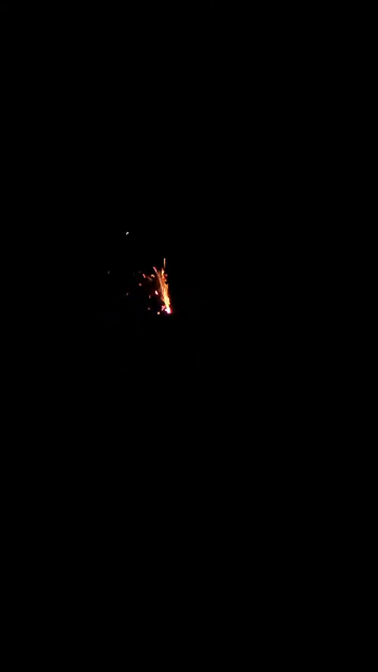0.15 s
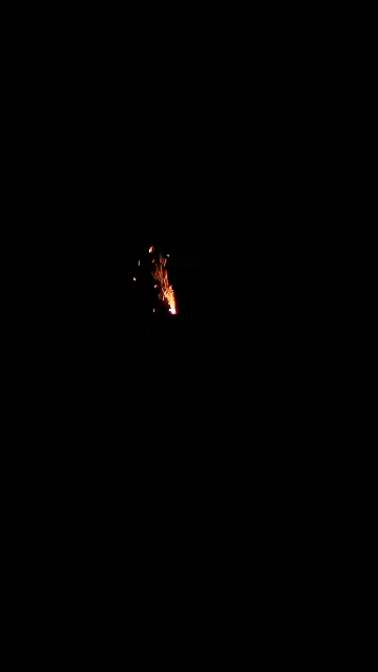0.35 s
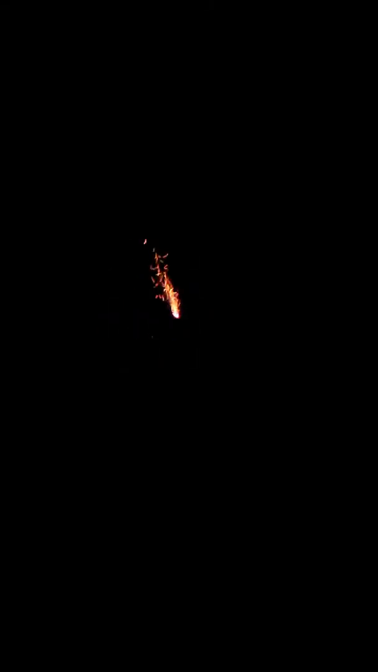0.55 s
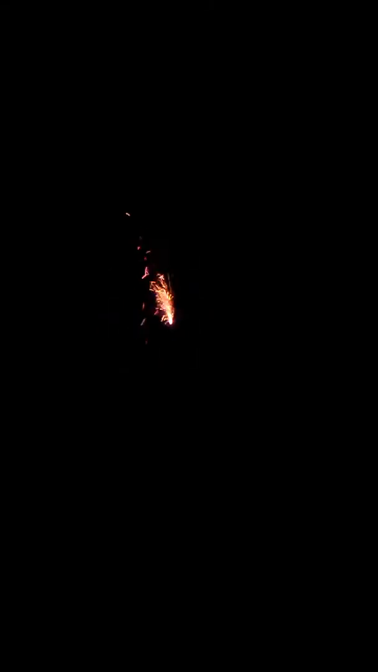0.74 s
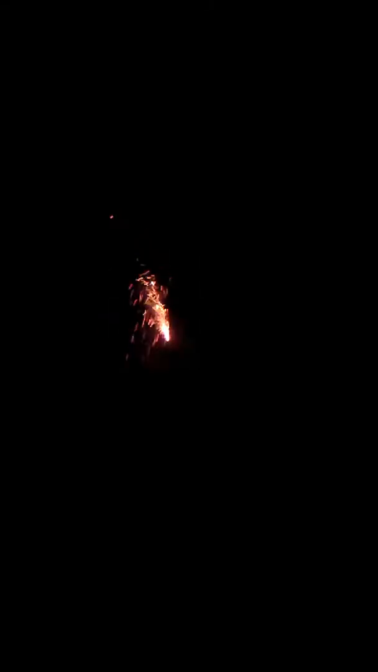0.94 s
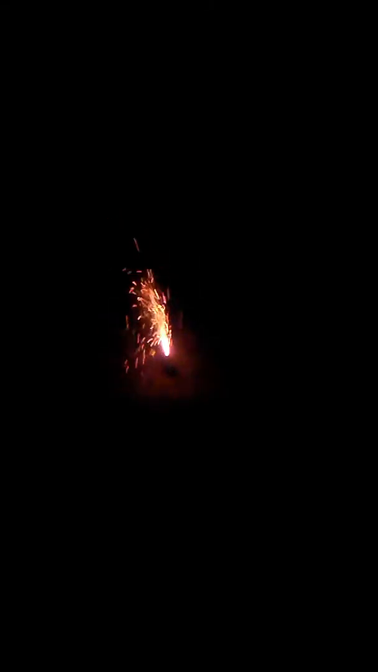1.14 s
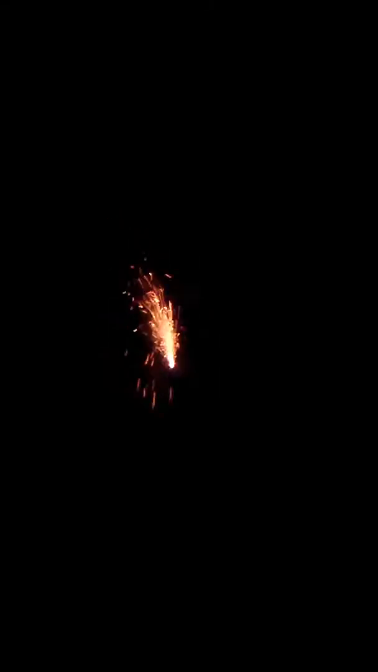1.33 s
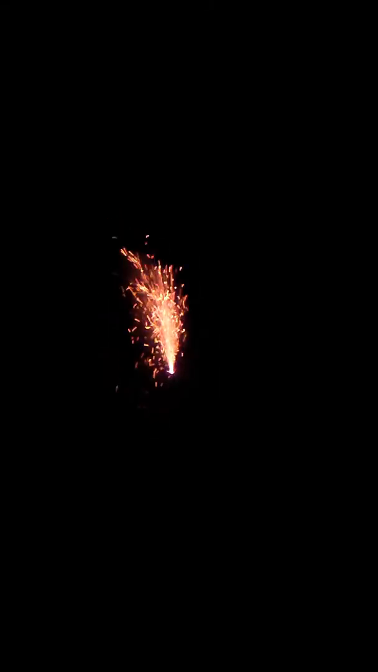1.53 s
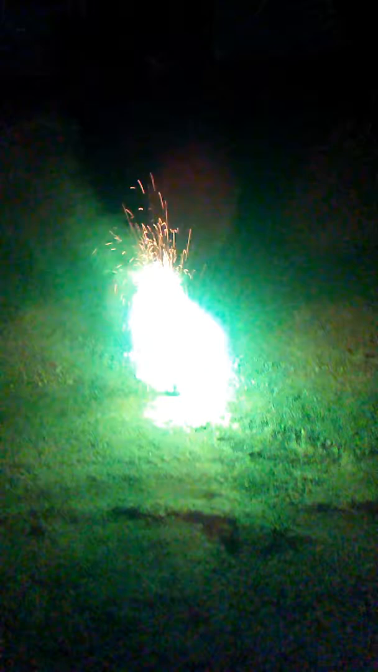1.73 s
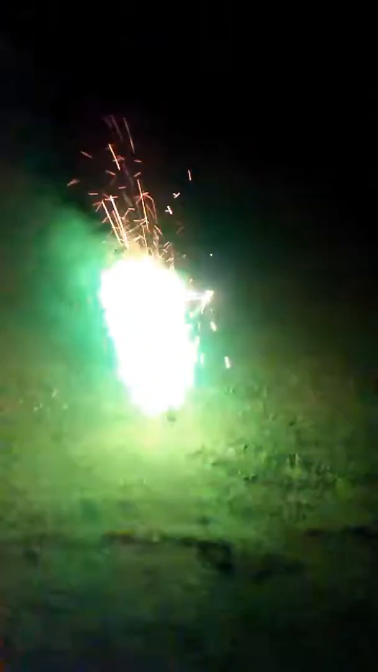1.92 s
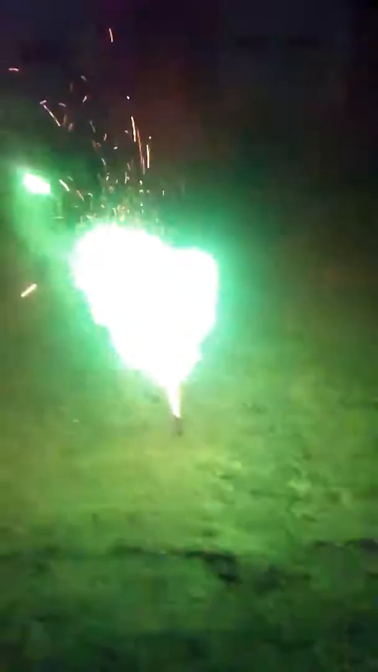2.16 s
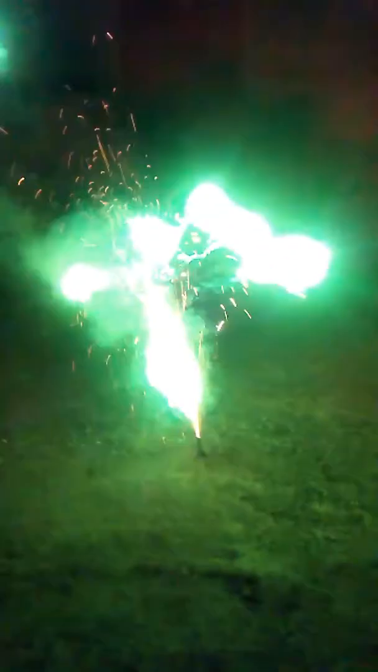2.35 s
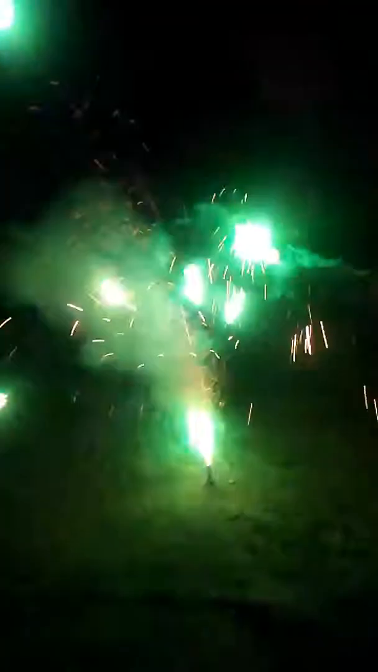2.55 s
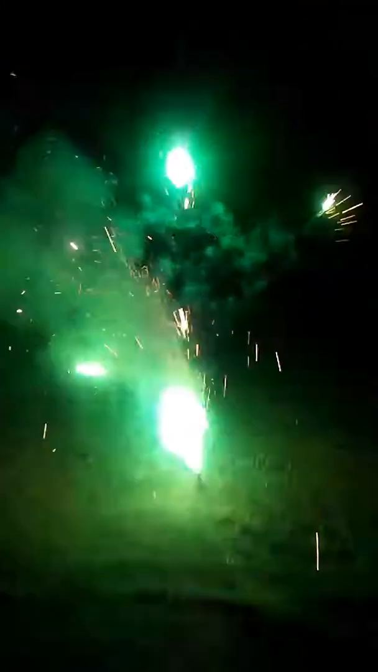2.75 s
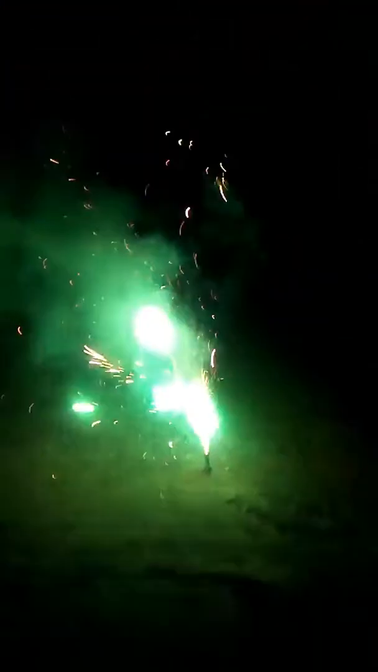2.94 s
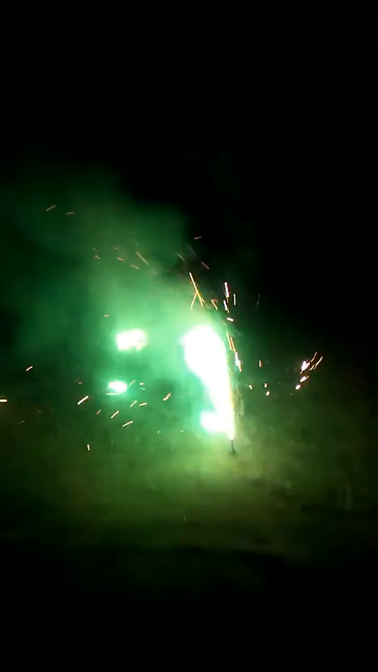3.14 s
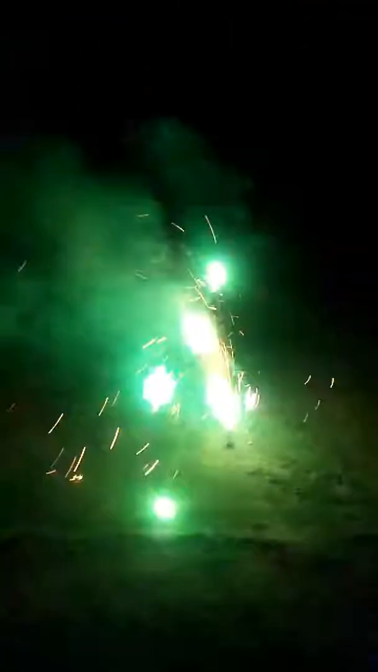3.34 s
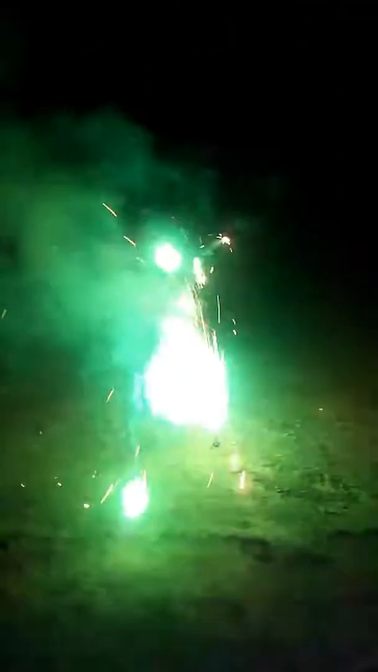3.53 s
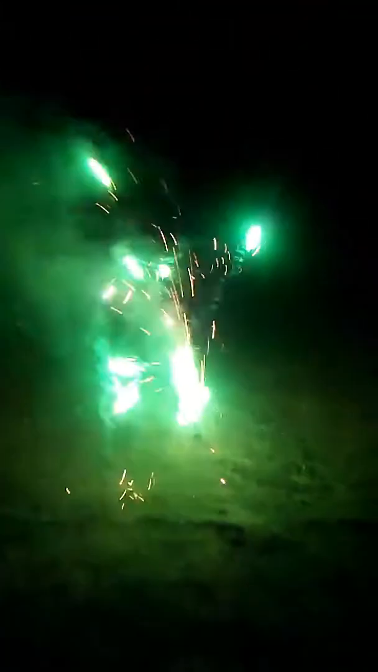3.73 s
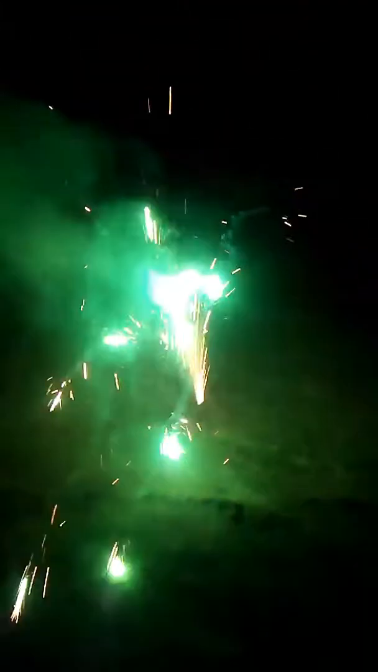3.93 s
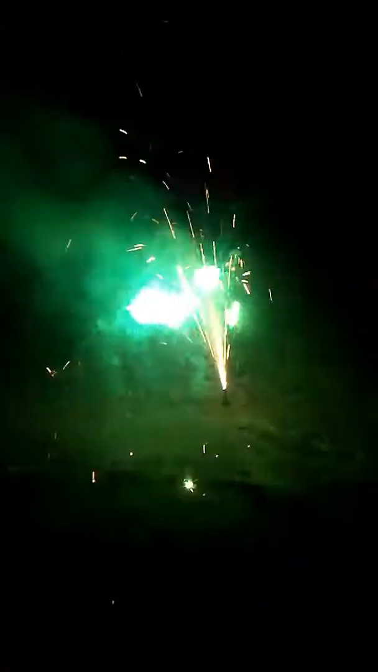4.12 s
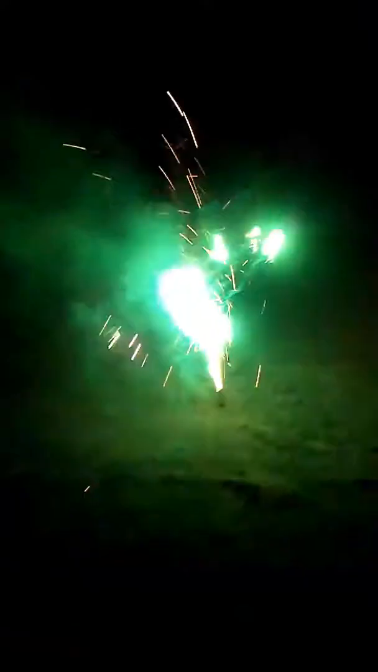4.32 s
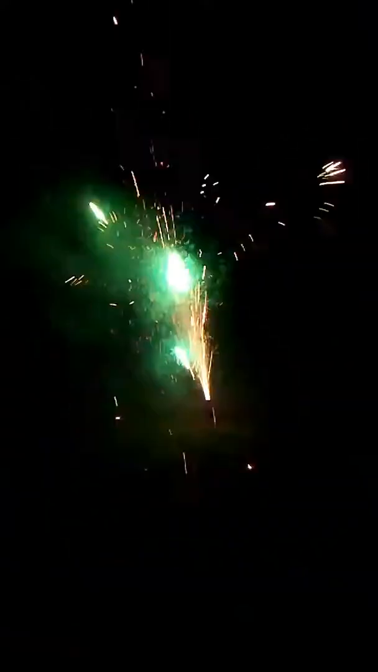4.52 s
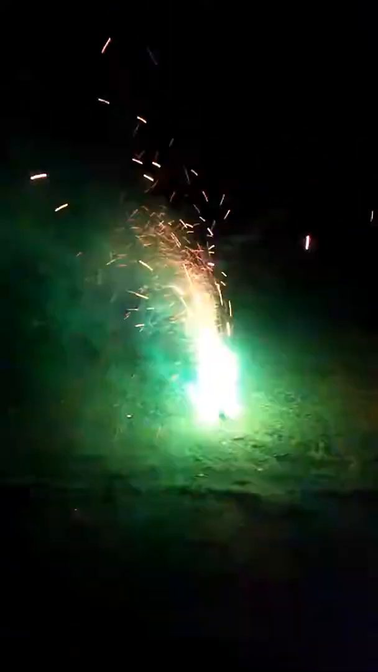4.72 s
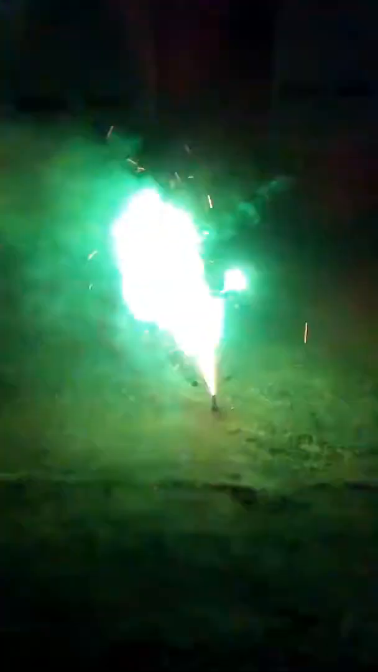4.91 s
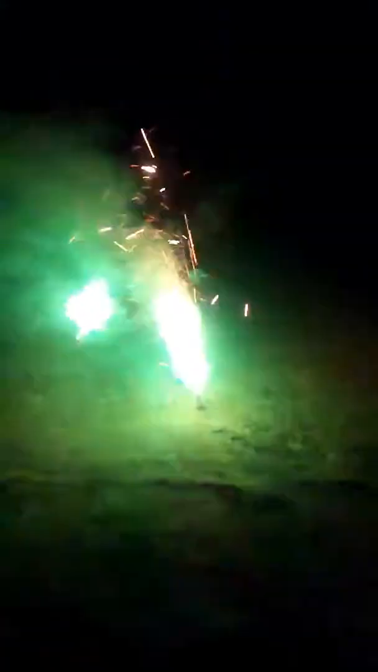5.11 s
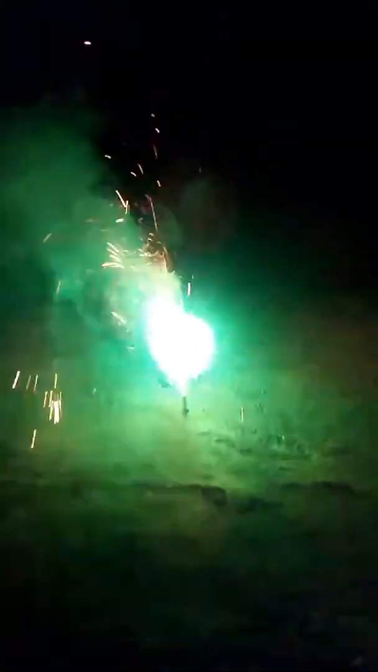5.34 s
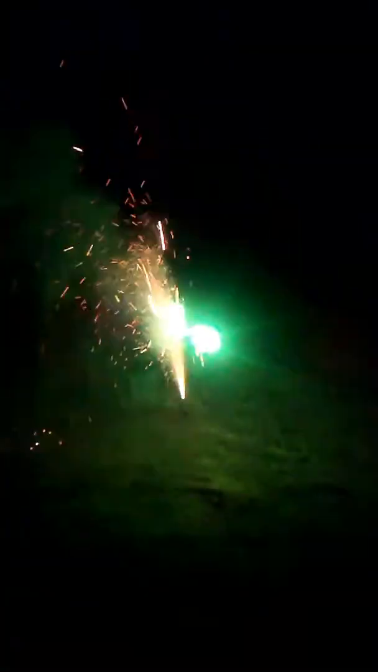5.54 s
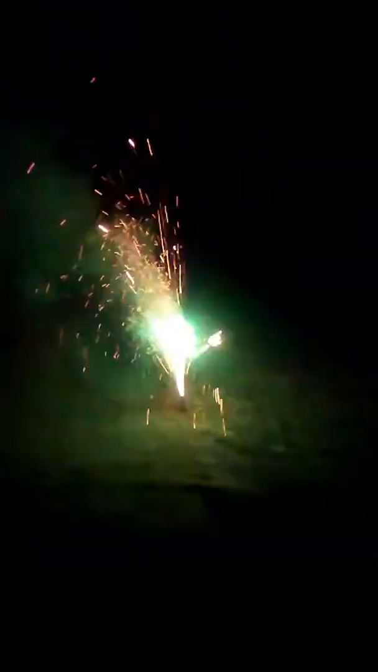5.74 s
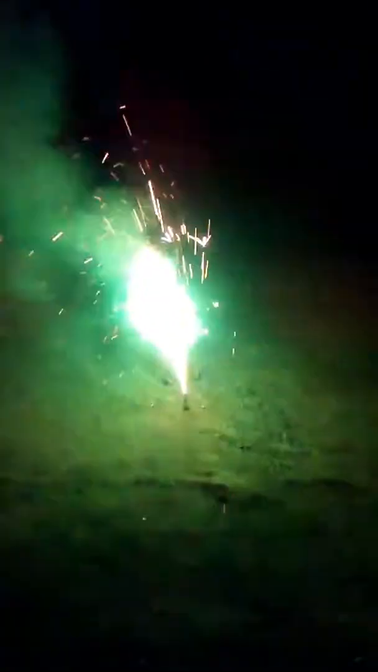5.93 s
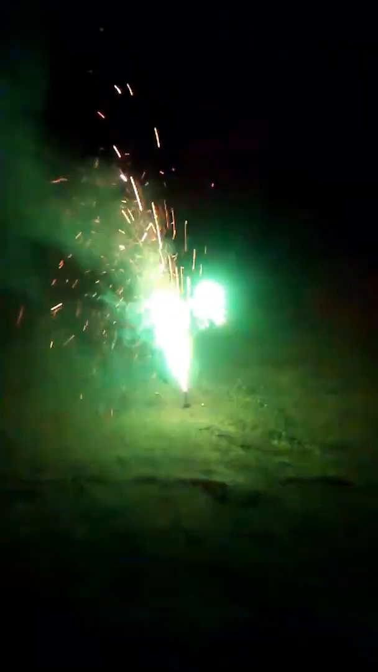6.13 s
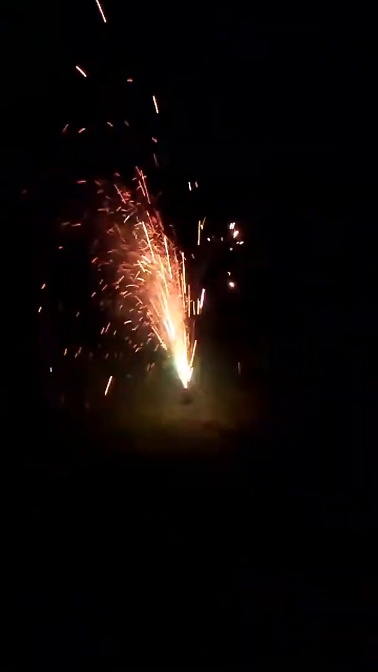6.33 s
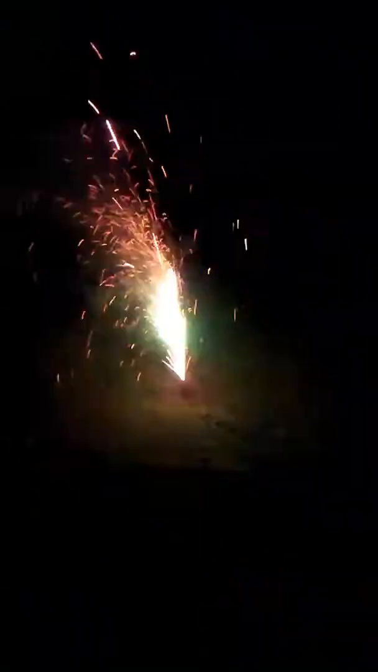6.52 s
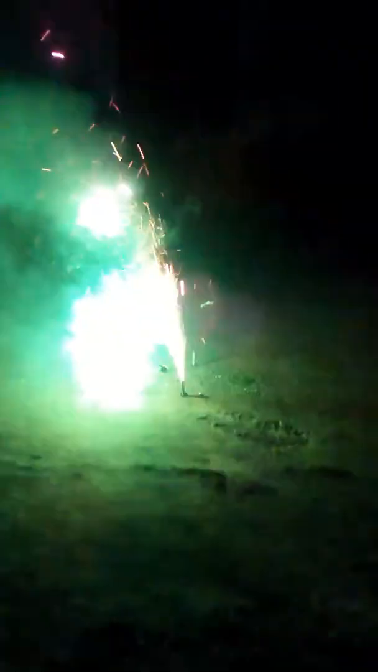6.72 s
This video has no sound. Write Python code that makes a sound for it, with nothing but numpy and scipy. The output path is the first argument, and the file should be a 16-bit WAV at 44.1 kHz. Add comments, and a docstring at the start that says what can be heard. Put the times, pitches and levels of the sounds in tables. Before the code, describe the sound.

Outdoors at night, a small firework fountain sizzles faintly, then bursts into a fluttering, rushing jet with uneven surges, snaps and soft flame puffs.

```python
"""Firework fountain on a lawn at night

A fountain burns a few metres from the microphone: a thin fizz of sparks, then the main charge catches and
the jet hisses and roars in surges, the flame flutters and puffs, and sparks crackle.
Sparks, jet and roar are noise modulated by random grains, shaped by spectra; the tube adds a resonant note.
The echo off the ground interferes with the direct sound and gives the hiss a slowly sweeping, hollow colour."""
import sys
import numpy as np
from scipy import signal
from scipy.fft import rfft, irfft
from scipy.io import wavfile

SR = 44100
rng = np.random.default_rng(int(sys.argv[2]) if len(sys.argv) > 2 else 0)


def put_to_file(sound):
    """Save the sound as 16-bit audio at rate SR, in the file named by the first command-line argument."""
    columns = np.atleast_2d(sound).T  # one column per channel
    safe = np.clip(columns, -1, 1)
    whole_steps = np.round(safe * 32767)
    wavfile.write(sys.argv[1], SR, whole_steps.astype(np.int16))


N = 302967
TIME = np.arange(N) / SR

# Spectrum of the coarse spark fizz: f/Hz, relative level/dB
FIZZ_SPECTRUM = [(3500, -80), (5000, -32.5), (6200, -18), (6900, -13.5), (7700, -9), (8900, -8),
                 (9700, -1.5), (10500, 1.5), (11300, -5.5), (12300, -14), (14000, -31), (16000, -30)]
# Spectrum of the finest sparks: f/Hz, relative level/dB
FINE_SPECTRUM = [(8000, -34), (11000, 3), (12400, 0.5), (14000, -2), (15300, -2), (16000, 1)]
# Spectrum of the jet hiss before the nozzle band: f/Hz, relative level/dB
JET_SPECTRUM = [(2400, -29), (3000, 2), (3700, -1), (4500, 0.5), (5600, 1), (6700, 4), (8000, -9.5),
                (9500, 1.5), (13000, -44)]

# dB that each layer gains per dB of surge
FIZZ_FOLLOWS, JET_FOLLOWS, TUBE_FOLLOWS, ROAR_FOLLOWS, FLAME_FOLLOWS = 0.74, 0.67, 0.82, 0.88, 0.42
# dB that each layer gains per dB of gas flow
JET_PER_GAS, TUBE_PER_GAS, ROAR_PER_GAS = 1, 1.21, 1.42
# levels at 0 dB of gas flow and surge (dB)
JET_DB, TUBE_DB, ROAR_DB = -37, -45, -44


def gain_of(db):
    """Level to amplitude: 20 dB is a factor of ten."""
    return 10 ** (np.asarray(db) / 20)


def evened(x):
    """Normalises the signal power, for an rms of 1."""
    return x / np.sqrt(np.mean(x ** 2) + 1e-20)


def follow(rows, t):
    """Linear interpolation of each column of a curve table at the times t."""
    s, *columns = np.transpose(rows)
    return [np.interp(t, s, column) for column in columns]


def colour(x, points):
    """Zero-phase filtering by a spectrum, interpolated in dB over log frequency; rms 1."""
    f, db = np.transpose(points)
    hz = np.fft.rfftfreq(len(x), 1 / SR)
    gain = gain_of(np.interp(np.log(hz + 1), np.log(f), db))
    return evened(irfft(rfft(x) * gain, len(x)))


def sweep(x, response, size=512):
    """Time-varying filtering: each short-time spectrum is multiplied by response(hz, t)."""
    overlap = size * 3 // 4
    hz, t, spectra = signal.stft(x, SR, nperseg=size, noverlap=overlap)
    return signal.istft(spectra * response(hz[:, None], t), SR, nperseg=size, noverlap=overlap)[1][:N]


def wander(low_hz, high_hz):
    """Random fluctuation of rms 1: band-limited noise whose power falls with frequency."""
    hz = np.fft.rfftfreq(N, 1 / SR)
    in_band = (hz > low_hz) * (hz < high_hz)
    return evened(irfft(rfft(rng.standard_normal(N)) * in_band / np.sqrt(hz + 1), N))


def add(mix, s, sound):
    """Superposition of a sound on the mix from time s."""
    part = mix[max(round(s * SR), 0):][:len(sound)]
    part += sound[:len(part)]


def band(hz, centre_hz, width_hz):
    """Lorentzian resonance curve, with a peak gain of 1."""
    return 1 / (1 + (1.05 * (hz - centre_hz) / width_hz) ** 2)


def sparks(per_s, spread_db, life_ms, steady):
    """Shot noise: random grains, each a decaying burst of noise of its own size, over a steady gas flow."""
    born = rng.random(N) < per_s / SR
    size = gain_of(spread_db * np.minimum(rng.exponential(1, N), 4))
    # the power of each grain decays exponentially with the time constant life_ms
    decay = np.exp(-1e3 / (life_ms * SR))
    power = signal.lfilter([1], [1, -decay], born * size ** 2)
    return rng.standard_normal(N) * np.sqrt(power / power.mean() + abs(steady))


def surges():
    """Power addition: surges swell, hold and decay over the steady burn; dB at nozzle, plume and tube."""
    # Surges of the main charge: start t/s, time to the start of the decay/s,
    # added power against the steady burn/dB, extra in the plume roar/dB, extra in the tube note/dB
    surge_list = [(1.66, 0.21, 5.5, -0.5, -2.5), (1.843, 0.5, 9.5, -0.5, -5), (2.286, 0.32, 8.5, -2.5, -6),
                  (2.76, 0.2, 3.5, 1, -3), (3.22, 0.35, 5.5, 4.5, 0), (3.516, 0.28, 10, 1.5, -3),
                  (3.93, 0.19, 8, -5, 2), (4.078, 0.28, 13, -8.5, 0.5), (4.38, 0.17, 9, -3, 0),
                  (4.58, 0.24, 2, -16, -0.5), (4.907, 0.33, 0.5, -9, -5), (5.072, 0.099, 8, -4.5, -6),
                  (5.56, 0.3, 8.5, -4.5, -5), (5.762, 0.16, 12.5, -2.5, -6), (5.94, 0.27, 8.5, 0, -2),
                  (6.23, 0.14, 8.5, -1, -1.5)]
    attack_s, release_s = 0.094, 0.054
    power = np.ones((3, N))
    for start, length, db, roar_db, tube_db in surge_list:
        age = TIME - start
        rise = np.clip(age / attack_s, 0, 1)
        shape = rise * np.exp(-np.maximum(age - length, 0) / release_s)
        power += np.outer(gain_of([db, db + roar_db, db + tube_db]), shape) ** 2
    return 10 * np.log10(power)


def spits():
    """Gaussian amplitude pulses: short spits of sparks and gas rise and fall quickly."""
    # Spits: t/s, peak level of the fizz/dB
    spit_list = [(.14, -34.5), (.5, -39), (1.615, -31), (1.74, -24.5), (2.37, -28), (2.85, -36),
                 (2.994, -24.5), (3.25, -25), (3.35, -23), (3.44, -28), (3.58, -32), (4.29, -22),
                 (5.17, -32), (5.38, -31), (5.865, -23), (6.21, -32), (6.35, -41), (6.5, -30), (6.865, -26)]
    spread_s = 0.014  # standard deviation of the pulse
    return sum(gain_of(db) * np.exp(-.5 * ((TIME - s) / spread_s) ** 2) for s, db in spit_list)


def ground(x):
    """Two-path interference: direct sound and the echo off the lawn, duller, cut a comb of notches."""
    # Echo, shifting as the microphone moves: t/s, delay/ms, strength before the lawn's weighting (ratio)
    echo_path = [(0, .790, .6), (.66, .783, .52), (.8, .752, .45), (1.05, .74, .5), (1.6, .671, .62),
                 (2.12, .644, .35), (2.35, .695, .42), (2.6, .712, .42), (2.92, .69, .25),
                 (3.15, .747, .44), (3.55, .694, .5), (3.72, .71, .38), (4.0, .79, .45), (4.35, .805, .47),
                 (4.95, .735, .52), (5.55, .733, .52), (5.97, .712, .46), (6.87, .723, .53)]

    def response(hz, t):
        delay_ms, strength = follow(echo_path, t)
        lawn = np.interp(hz, [5000, 9000, 15000], [1.45, .9, .65])
        echo = np.clip(strength * lawn, 0, .8)
        turns = hz * delay_ms / 1000  # phase lag in cycles
        return (1 + echo * np.exp(-2j * np.pi * turns)) / np.sqrt(1 + echo ** 2)
    return sweep(x, response)


def night():
    """Stationary broadband noise: the faint hush of the night."""
    # Spectrum of the hush: f/Hz, relative level/dB
    hush_spectrum = [(20, -49), (60, 10), (130, -5), (480, 2), (800, -7.5), (1500, -8.5), (4000, -15.5),
                     (16000, -12)]
    return gain_of(-70) * colour(rng.standard_normal(N), hush_spectrum)


def puffs():
    """Transient band noise: gas flares up in short lumps that swell quickly and die away."""
    # Soft puffs of flame: t/s, relative peak level/dB, centre f/Hz, nominal length/s
    puff_list = [(1.979, -46, 290, 0.025), (2.202, -38, 1360, 0.022), (2.498, -42, 287.5, 0.042),
                 (3.29, -35, 1460, 0.11), (3.345, -38.5, 159, 0.077), (3.41, -38, 143, 0.042),
                 (3.478, -33, 272, 0.037), (3.739, -41, 237, 0.12), (4.016, -29, 78, 0.072),
                 (4.164, -40, 283, .04), (4.338, -38, 158, 0.05), (4.497, -29.5, 1440, 0.063),
                 (4.65, -42, 320, .04), (4.8, -41, 304, 0.027), (5.255, -52, 89.5, .04),
                 (5.694, -40, 280, 0.027), (5.899, -32.5, 257, 0.027), (5.93, -46, 110, 0.031),
                 (6.128, -37.5, 152, 0.077), (6.344, -41, 265, 0.048), (6.555, -40.5, 275, 0.041)]
    width, level_db = 0.34, -1  # width in natural log of frequency; level added to every puff
    out, t = np.zeros(N), np.arange(8192) / SR
    hz = np.fft.rfftfreq(len(t), 1 / SR)
    for s, db, centre_hz, length in puff_list:
        spectrum = np.exp(-.5 * (np.log((hz + 1) / centre_hz) / width) ** 2)
        random_phase = np.exp(2j * np.pi * rng.random(len(hz)))
        age = t / (0.29 * length)  # the swell peaks at age 1
        lump = irfft(spectrum * random_phase) * age ** 2 * np.exp(-2 * age)
        add(out, s, gain_of(db + level_db) * lump / abs(lump).max())
    return out


def ticks():
    """Sparse shot noise: lone sparks snap one by one, clearest while the fountain is still quiet."""
    return gain_of(-52) * colour(sparks(per_s=60, spread_db=1.5, life_ms=.15, steady=0), FIZZ_SPECTRUM)


def cracks():
    """Impulsive sources: large sparks burst as noise that decays within about a millisecond."""
    # Loud cracks: t/s, relative peak level/dB
    crack_list = [(1.620, -8), (1.973, -16), (1.985, -13), (2.007, -17), (2.029, -2.5), (2.135, 1.5),
                  (2.162, 0.5), (2.187, -14), (2.427, -14), (2.888, -19), (2.972, -18), (3.565, -4),
                  (3.803, 1), (4.158, 1.5), (4.348, -14), (4.606, -13), (6.095, -3)]
    decay_ms, level_db = 1.2, -5.5  # amplitude time constant; level added to every crack
    out, t = np.zeros(N), np.arange(1024) / SR
    for s, db in crack_list:
        burst = rng.standard_normal(len(t)) * np.exp(-1e3 * t / decay_ms)
        snap = np.pad(burst, (len(t), 0))  # silence ahead leaves room for the zero-phase filters
        # each filter acts on the same burst, and their outputs add
        snap = colour(snap, FIZZ_SPECTRUM) + .5 * colour(snap, FINE_SPECTRUM) + 0.31 * colour(snap, JET_SPECTRUM)
        add(out, s - t[-1], gain_of(db + level_db) * snap / abs(snap).max())
    return out


def tube(gas_db, surge_db, sputter):
    """Air-column resonance: rushing gas excites the tube's note, broader once the main charge burns."""
    # Air note of the cardboard tube: t/s, f/Hz
    air_note = [(0, 3030), (.85, 2940), (1.42, 3050), (2.1, 3300), (2.5, 2650), (3.65, 2950), (3.97, 2660),
                (4.4, 2850), (4.8, 2680), (5.5, 2840), (6.87, 2960)]

    def response(hz, t):
        width_hz = np.interp(t, [1.4, 2.3], [480, 720])
        return band(hz, follow(air_note, t)[0], width_hz) ** 2 / np.sqrt(width_hz)
    note = evened(sweep(rng.standard_normal(N), response))
    level_db = TUBE_DB + TUBE_PER_GAS * gas_db + TUBE_FOLLOWS * surge_db
    return note * gain_of(level_db + 0.92 * sputter)


def plume(gas_db, roar_surge_db, surge_db, sputter):
    """Combustion noise: the tall plume roars once the charge has caught; its flame flutters below."""
    # Level of the flame flutter between surges: t/s, level/dB
    flame_level = [(0, -88), (1.65, -73), (1.78, -66), (3.19, -61.5), (3.25, -52), (3.9, -54), (4.5, -53),
                   (5.0, -60.5), (5.75, -59), (5.92, -52), (6.87, -61)]
    # Spectrum of the plume roar: f/Hz, relative level/dB
    roar_spectrum = [(900, -30.5), (1200, -33.5), (1450, -13), (1700, 0), (1950, 4.5), (2220, 1.5),
                     (2440, -7.5), (2800, -14), (4000, -96)]
    # Spectrum of the flame flutter: f/Hz, relative level/dB
    flutter_spectrum = [(30, -12), (60, -22.5), (100, -2), (170, -3.5), (250, 4), (320, 7), (440, 2),
                        (640, -11.5), (730, -8), (830, -0.5), (1050, -12), (1300, 1), (1700, -3),
                        (3000, -52)]
    caught_s, rise_s, unlit_db = 1.585, 0.035, -6  # end and length of the rise; roar step before it

    unlit = np.clip((caught_s - TIME) / rise_s, 0, 1)
    roar_db = ROAR_DB + ROAR_PER_GAS * gas_db + ROAR_FOLLOWS * roar_surge_db + unlit_db * unlit
    roar_db = roar_db + 0.99 * sputter + 1.23 * wander(6.8, 18)
    flame_db = follow(flame_level, TIME)[0] + FLAME_FOLLOWS * surge_db
    roar = colour(sparks(per_s=1300, spread_db=1.8, life_ms=2.0, steady=1.0), roar_spectrum)
    flutter = colour(rng.standard_normal(N), flutter_spectrum) * gain_of(2.8 * wander(7, 40))
    return roar * gain_of(roar_db) + flutter * gain_of(flame_db)


def nozzle(gas_db, surge_db, sputter):
    """Modulated jet noise: sparks and hiss pulse together as the powder burns unevenly."""
    # Band of the jet, widening from a narrow whistle as the nozzle burns open:
    # t/s, centre f/Hz, nominal width f/Hz
    jet_band = [(0, 5160, 820), (.6, 5200, 810), (.85, 5170, 900), (1.12, 4860, 900), (1.45, 4600, 655),
                (1.65, 4780, 1200), (2.0, 4540, 2400), (2.35, 5060, 7300), (4.2, 7000, 8800),
                (6.87, 6460, 6200)]
    # Supply of sparks between surges, thin at first and running out at the end: t/s, level/dB
    spark_supply = [(0, -35.5), (.35, -37.5), (.62, -34), (.78, -34.5), (1.45, -31), (1.54, -38),
                    (1.85, -27.5), (3.1, -27), (6.5, -30), (6.68, -38.5), (6.87, -38.5)]
    # Share of the finest sparks: t/s, level against the coarse fizz/dB
    fine_curve = [(0, 0), (.45, -5), (.7, 2), (1.1, 3), (1.6, -7), (2.1, 0), (2.45, -5.5), (2.88, 3),
                  (3.3, 1), (4.0, -3.5), (4.3, -2.5), (6.87, -3)]
    spit_jet_db = -7  # jet hiss of a spit against its fizz

    def opening(hz, t):
        gain = band(hz, *follow(jet_band, t)) ** 2.1
        core = (hz[:, 0] > 3800) & (hz[:, 0] < 5800)
        return gain / np.sqrt(np.mean(gain[core] ** 2, 0))  # the core keeps its power as the skirts spread

    # independent sources add in power
    spit = spits()
    fizz_level = np.hypot(gain_of(follow(spark_supply, TIME)[0] + FIZZ_FOLLOWS * surge_db), spit)
    jet_db = JET_DB + JET_PER_GAS * gas_db + JET_FOLLOWS * surge_db
    jet_level = np.hypot(gain_of(jet_db), gain_of(spit_jet_db) * spit)

    coarse = colour(sparks(per_s=2500, spread_db=1.8, life_ms=0.76, steady=0.77), FIZZ_SPECTRUM)
    fine = colour(sparks(per_s=2500, spread_db=3.0, life_ms=0.5, steady=.8), FINE_SPECTRUM)
    fine_share = gain_of(follow(fine_curve, TIME)[0])
    fizz = (coarse + fine_share * fine) / np.sqrt(1 + fine_share ** 2)
    hiss = colour(sparks(per_s=2400, spread_db=3.5, life_ms=1.0, steady=0.94), JET_SPECTRUM)
    jet = sweep(hiss, opening)
    return fizz * fizz_level * gain_of(0.87 * sputter) + jet * jet_level * gain_of(.5 * sputter)


def scene():
    """Superposition of the fountain, in part over the reflecting ground, and the hush of the night."""
    # Gas flow, which falters and then jumps as the main charge catches: t/s, level against the steady burn/dB
    gas_flow = [(0, -19.5), (.13, -14), (.38, -15), (.5, -13), (.76, -24.5), (1.05, -24.5), (1.4, -10),
                (1.54, -9), (1.58, -3), (1.75, 1), (2.95, 0.5), (3.1, -1), (3.4, 0.5), (4.3, -0.5),
                (6.87, 0)]
    sputter = wander(13, 80) * np.interp(TIME, [1.4, 1.9], [.55, 1])  # the main charge burns less evenly
    gas_db = follow(gas_flow, TIME)[0]
    surge_db, roar_surge_db, tube_surge_db = surges()
    near_ground = ticks() + cracks() + tube(gas_db, tube_surge_db, sputter) + nozzle(gas_db, surge_db, sputter)
    above = puffs() + plume(gas_db, roar_surge_db, surge_db, sputter)
    return (night() + above + ground(near_ground))[None]


def record(dry):
    """Linear filtering: a narrow dip in the microphone's response, then a low-pass band limit."""
    edge_hz = 15780
    dip = 1 - .72 * band(np.fft.rfftfreq(2 * N, 1 / SR), 2450, 110)
    heard = irfft(rfft(dry, 2 * N) * dip, 2 * N)[:, :N]
    low_pass = signal.firwin(1501, edge_hz, window=("kaiser", 9), fs=SR)
    return signal.oaconvolve(heard, low_pass[None], "same")


dry = scene()
out = record(dry)
put_to_file(out)
```